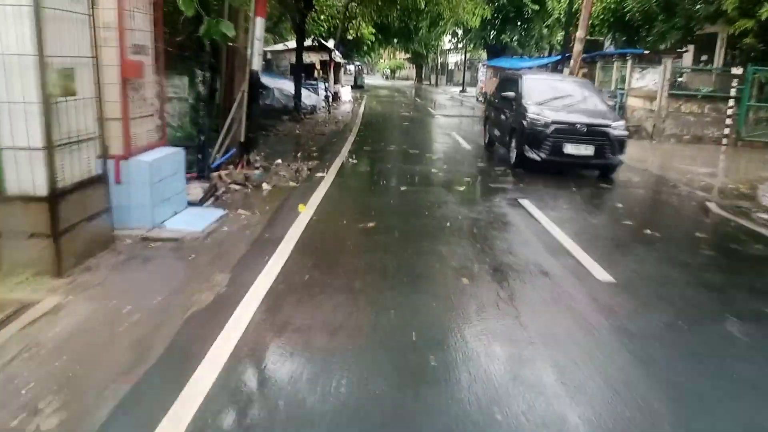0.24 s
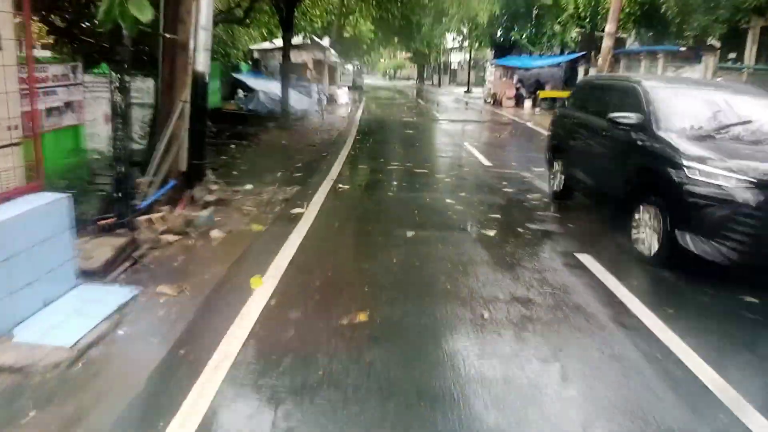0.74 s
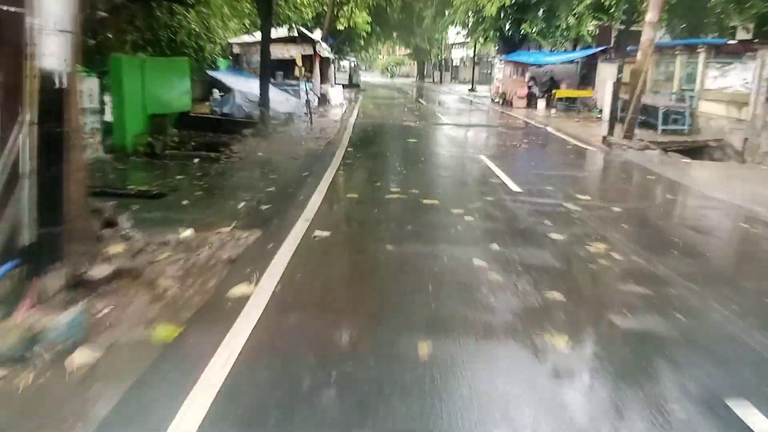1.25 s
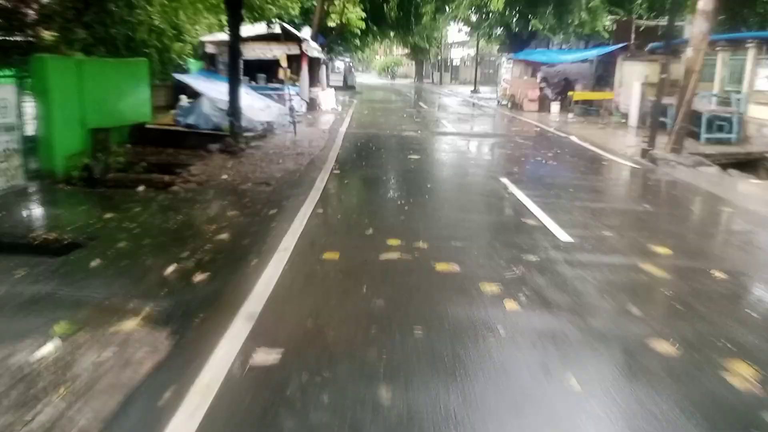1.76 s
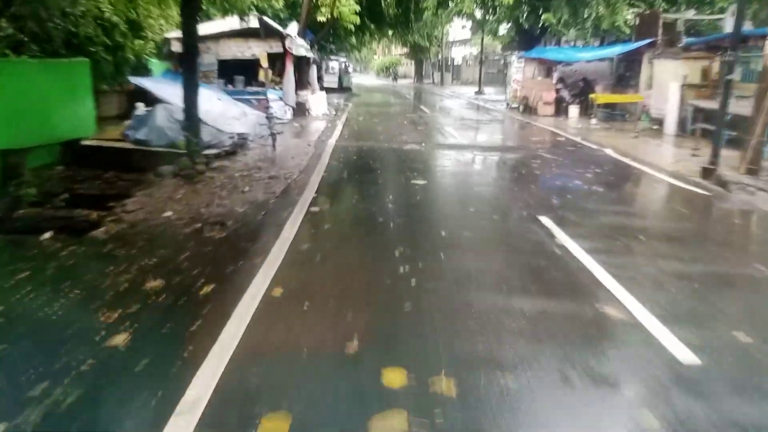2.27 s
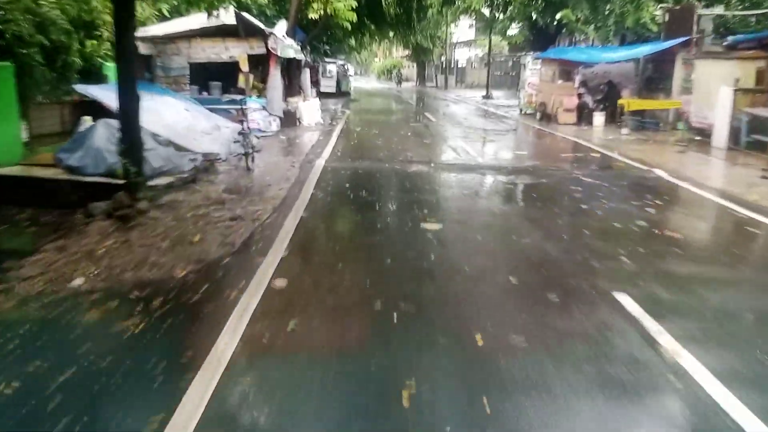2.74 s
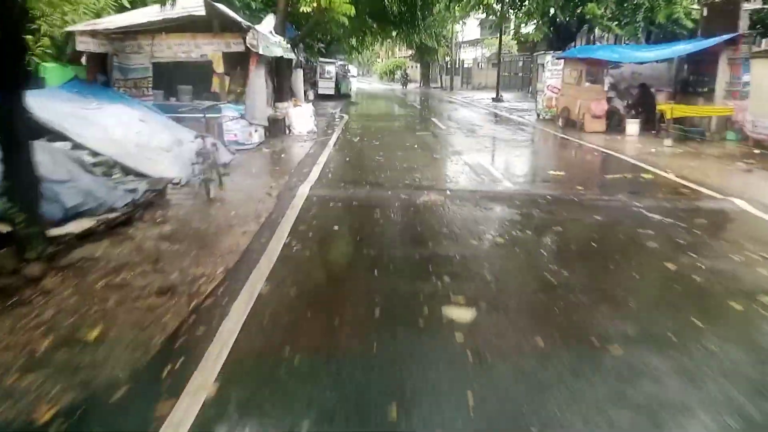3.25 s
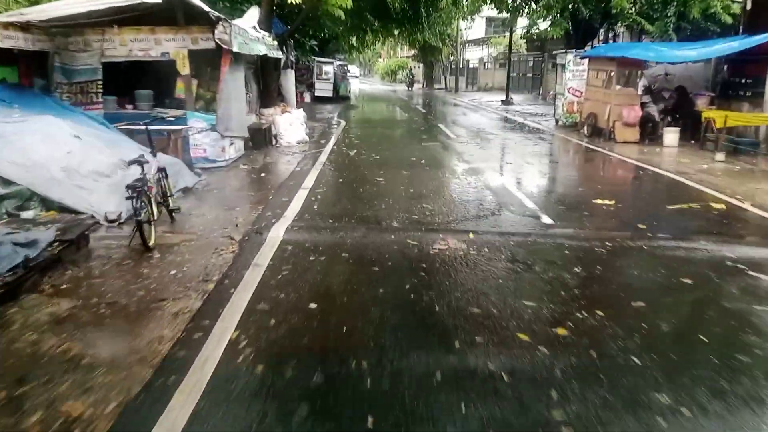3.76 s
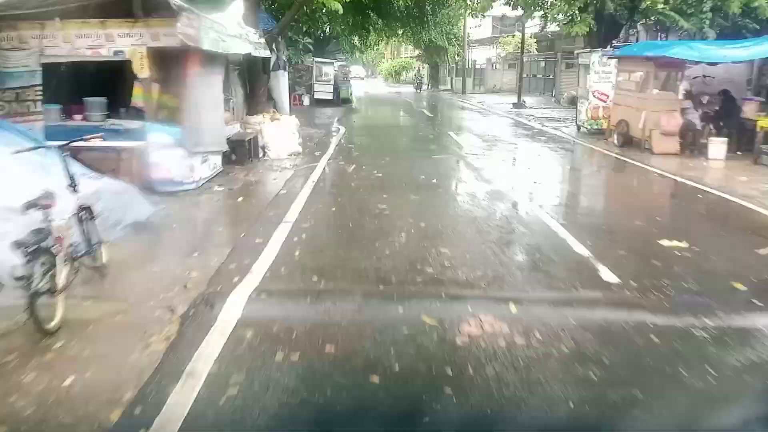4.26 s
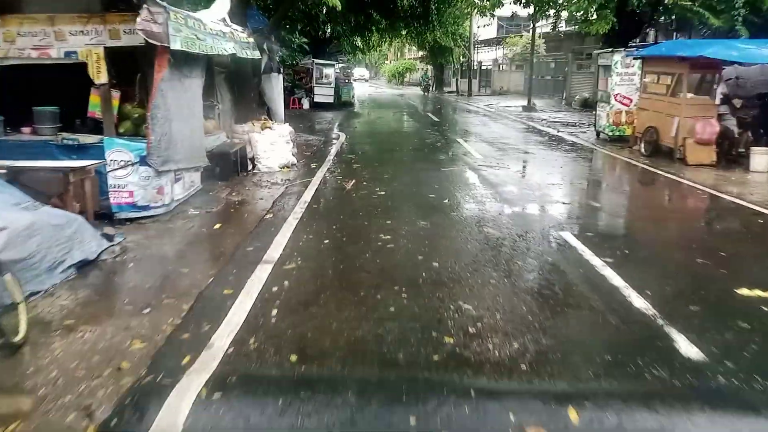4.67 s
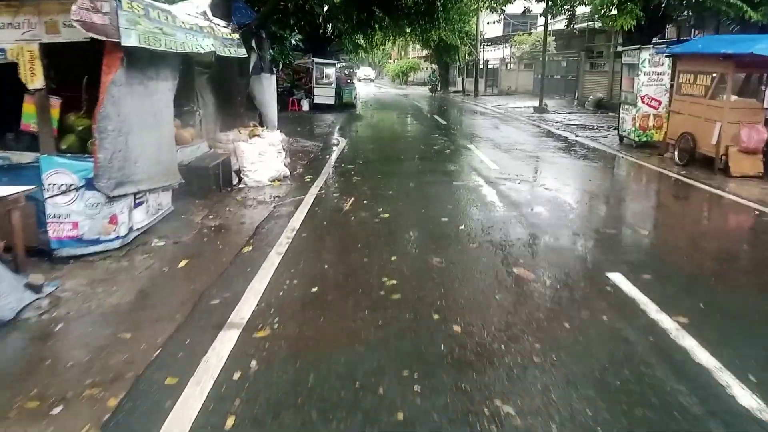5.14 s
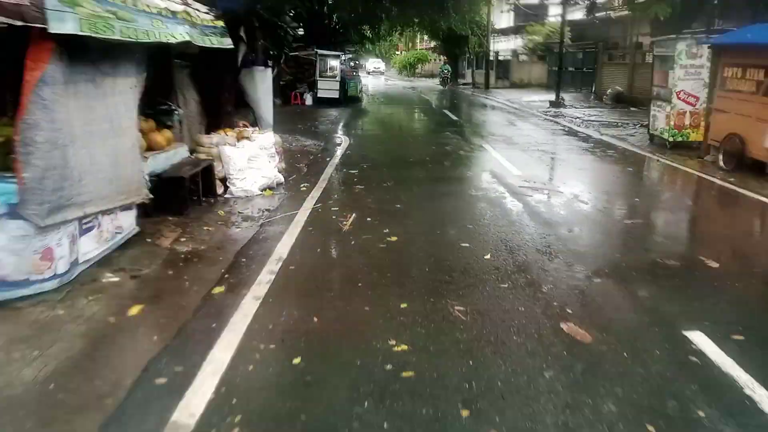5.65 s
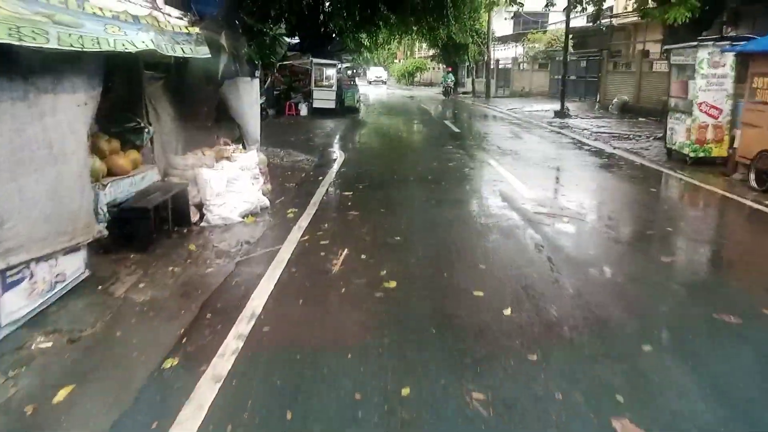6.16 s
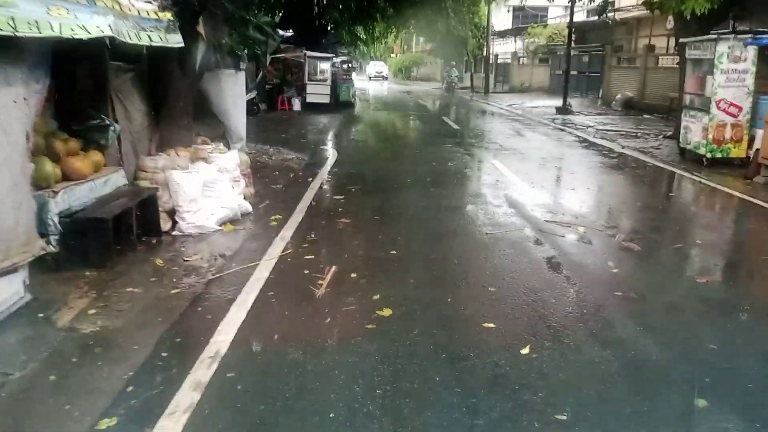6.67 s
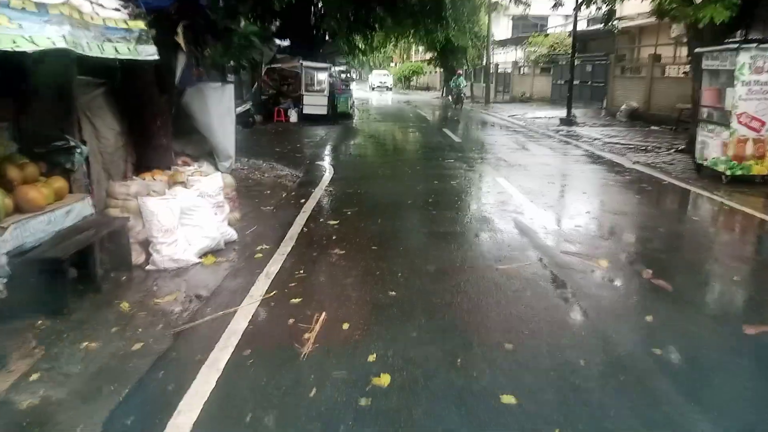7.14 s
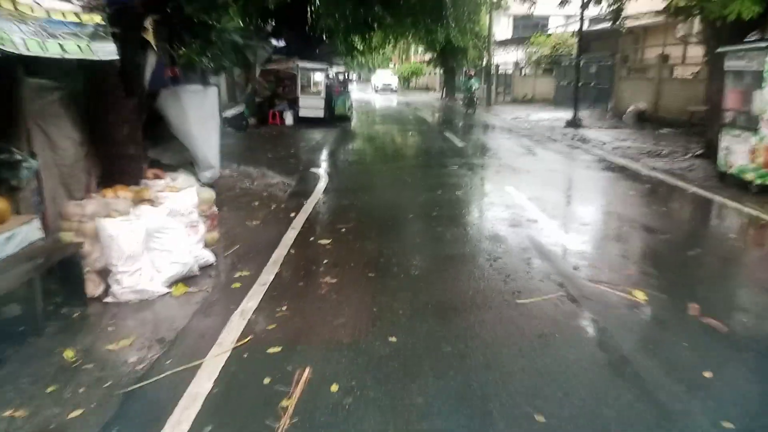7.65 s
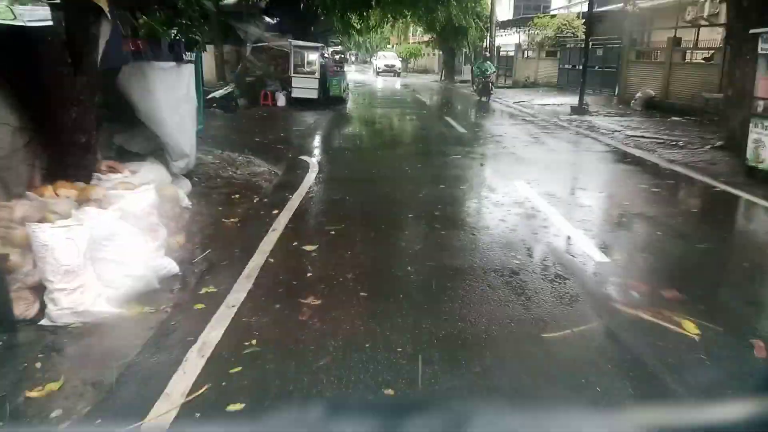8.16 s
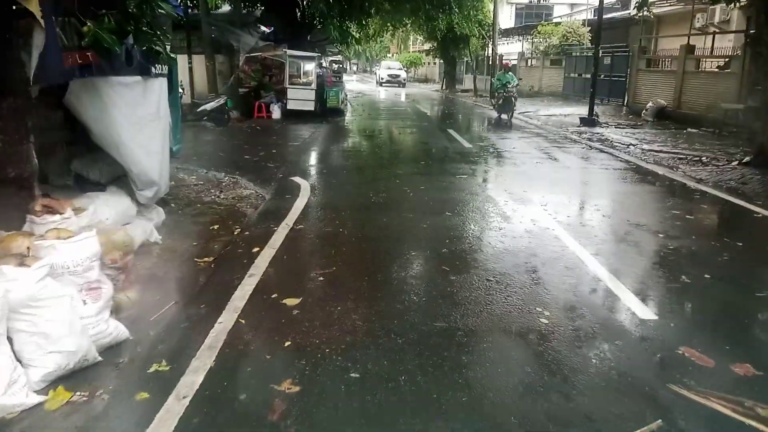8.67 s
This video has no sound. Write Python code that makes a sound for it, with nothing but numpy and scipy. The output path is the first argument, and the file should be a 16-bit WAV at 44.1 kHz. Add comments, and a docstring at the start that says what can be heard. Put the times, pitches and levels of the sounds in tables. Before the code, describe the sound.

Behind a rainy windscreen, hollow wiper knocks punctuate a low motor hum that eases into idle, with tyre spray, rattles and a passing car's hiss.

```python
"""Riding behind the windscreen of a small motorcycle-engined vehicle on a wet street.
At first the engine hums near a steady speed, a sum of firing orders; a car's noise-made spray peaks at 1.6 s.
From 2.4 s the engine eases off, its gear whine gliding down, to a chugging idle at 5.2 s; it picks up at 8.5 s.
Throughout, wiper knocks ring screen modes, catches and rattles are noise bursts, drops splash and ping the shell.
Coloured noise makes wind and road rumble and tyre spray, which follow road speed, and a background hiss."""
import sys
import numpy as np
from scipy import signal
from scipy.fft import rfft, irfft, next_fast_len
from scipy.io import wavfile
from scipy.ndimage import map_coordinates

SR = 44100
rng = np.random.default_rng(int(sys.argv[2]) if len(sys.argv) > 2 else 0)


def bounce(signal):
    """Save signal as a 16-bit WAV file at the path given by the first command-line argument."""
    frames = np.transpose(np.atleast_2d(signal))
    limited = np.clip(frames, -1, 1)
    pcm = np.round(limited * 32767).astype(np.int16)
    wavfile.write(sys.argv[1], SR, pcm)


N = 392931
TIME_S = np.arange(N) / SR

# noise colours, relative: freq_hz, density_db (per Hz)
HISS_COLOUR = [(500, 8), (1500, 10.5), (2050, -7), (2300, 6.5), (2850, 3.5), (3150, -7), (3500, 4),
               (4250, 3), (4700, 0.5), (5300, 5.5), (6300, 7.5), (7600, 1.5), (9000, -4), (11000, -17.5),
               (15500, -34.5)]
RUMBLE_COLOUR = [(30, -15), (68, 2), (98, 4), (180, 3.5), (270, -4), (410, -6), (520, -11.5), (680, -16.5),
                 (1000, -25), (2000, -62)]
SPRAY_COLOUR = [(400, 4.5), (850, 4.5), (1400, 7.5), (2000, 1), (3200, -5.5), (5000, -7.5), (6600, -4.5),
                (8500, -14), (10500, -23.5), (13300, -33), (15200, -22.5)]
CAR_COLOUR = [(500, -6), (900, 7), (1500, 5), (2200, -2.5), (3500, -6), (5500, -4), (6800, -7),
              (8500, -11.5), (10500, -21), (13300, -31), (15200, -17.5)]
SPLASH_COLOUR = [(1500, 4), (3000, 7), (5500, 4.5), (8000, 2.5), (11000, -11.5), (13000, -19), (15200, -15)]
THUD_COLOUR = [(110, 2), (180, 2), (270, -2), (400, -1), (520, -15), (680, -17.5), (1000, -35)]
CLACK_COLOUR = [(500, -5), (720, -2.5), (900, -1.5), (1130, -0.5), (1450, -11), (1800, -21), (2600, -29)]
CHIRP_COLOUR = [(1300, -17), (1800, -5), (2250, 0.5), (2700, -6), (3200, -11), (4500, -16), (7000, -21),
                (12000, -52)]
CLATTER_COLOUR = [(150, 5), (350, 1), (450, 13), (520, 15), (580, 5), (630, 8.5), (720, -19), (830, -3.5),
                  (1100, -3.5), (1420, -1.5), (1950, -14), (2400, -13.5), (4500, -19), (9000, -55)]
# how far narrow bands of the background hiss sink and return: freq_hz, depth_db
HISS_PATCH_DEPTH = [(1300, 0), (2200, 4.5), (4800, 4.5), (7000, 1.3)]
# road speed: time_s, share_of_cruise
ROAD_SPEED = [(0, 1), (2.4, 1), (2.8, 0.92), (3.25, 0.61), (4.8, 0.62), (5.2, 0.27), (6.3, 0.35),
              (8.2, 0.43), (8.91, 0.75)]
# drops on the shell: start_s, splash_db, ping_db
DROP_HITS = [(0.971, -44, -52), (3.085, -50.5, -41), (3.319, -41, -47), (4.405, -53, -48),
             (4.798, -51, -42), (5.681, -50.5, -55), (6.179, -56, -56), (6.346, -50, -38),
             (6.377, -45.5, -51), (8.58, -38, -48), (8.878, -42, -48)]
# shell modes: pitch_hz, level_db, t60_s
SHELL_MODES = [(3670, -5.5, 0.027), (5600, -4, 0.022)]
# blade catches and frame rattles: start_s, thud_db, clack_db, chirp_db
CATCHES_AND_RATTLES = [(1.331, -32.5, -51, -54), (2.287, -24.5, -35, -52), (3.557, -25.5, -47, -48),
                       (3.576, -31, -54, -50), (3.605, -46, -41, -46), (3.63, -23.5, -41.5, -61),
                       (3.687, -28, -39, -59), (4.078, -34, -49, -48), (4.336, -35, -41, -49),
                       (4.363, -23, -47, -49), (4.401, -30, -46, -51), (4.614, -29, -41, -56),
                       (4.829, -26, -48, -50), (4.87, -26.5, -38, -47), (4.888, -26, -39, -48),
                       (4.951, -24, -35.5, -50), (4.974, -32, -46, -60), (4.983, -28, -39, -66),
                       (4.995, -34, -47, -65), (5.006, -32.5, -43, -64), (5.021, -33.5, -50, -62),
                       (5.072, -35.5, -47, -62), (5.179, -37.5, -42, -51), (5.217, -33.5, -41.5, -57),
                       (5.776, -42, -51, -61), (6.014, -35.5, -44, -60), (6.083, -46, -55, -50),
                       (6.128, -34, -52, -46), (6.157, -24, -40, -48), (6.18, -37, -45, -57),
                       (6.203, -27.5, -52, -62), (6.251, -26, -39, -51), (6.272, -37, -50, -58),
                       (6.295, -24, -35.5, -57), (7.405, -37.5, -43, -55), (7.431, -26, -44, -59),
                       (7.45, -30, -46, -58), (7.474, -27, -37, -50), (7.518, -35, -49, -53),
                       (7.557, -21.5, -41, -51), (7.592, -24, -41, -60), (7.879, -42, -52, -56),
                       (7.934, -33, -41.5, -52), (8.238, -37, -41, -53), (8.581, -34.5, -38, -53),
                       (8.597, -38.5, -46, -48), (8.639, -31.5, -40, -56), (8.679, -33, -33.5, -49),
                       (8.742, -28, -46, -54), (8.769, -21, -35.5, -42.5), (8.826, -31, -39, -46),
                       (8.85, -31, -38, -56), (8.872, -31, -35, -46), (8.893, -28.5, -32.5, -47)]
# wiper cycles: far_turn_s, far_knock_db, near_knock_db
WIPER_CYCLES = [(1.082, -19.5, -10), (2.374, -15, -14), (3.656, -21, -11.5), (4.956, -17, -11.5),
                (6.29, -15, -8), (7.558, -16.5, -8.5), (8.896, -19, -8.5)]
# arm flips over, rocks back, settles: delay_s, level_db, direction (+1 or -1)
ARM_CONTACTS = [(0, -1, 1), (.0081, -3, -1), (.0193, -4, 1)]
# windscreen and frame modes: pitch_hz, level_db, t60_s
SCREEN_MODES = [(154, -5, 0.02), (187.3, -6, 0.13), (286, -11.5, 0.12), (389, -9.5, 0.065),
                (458.6, -15.5, 0.095), (884, -24.5, 0.032)]
# engine speed: time_s, firing_hz
FIRING_RATE = [(0, 57.43), (.5, 58.09), (1.95, 58.84), (2.35, 57.83), (2.8, 55.84), (3.75, 45.27),
               (4.4, 38.07), (4.9, 31.53), (5.2, 22.06), (5.5, 21.06), (6.2, 21.27), (7.0, 20.78),
               (7.4, 19.0), (8.2, 19.6), (8.58, 24.5), (8.91, 23.19)]
# exhaust boom: time_s, level_db, bite_db (per octave of order)
THROTTLE_CURVE = [(0, -18.5, 0.5), (1.4, -19, 0), (1.8, -20, 1), (2.15, -19, 0), (2.65, -16, -4.5),
                  (3.0, -17, -0.5), (4.0, -20, 2.5), (4.75, -22.5, -0.5), (4.95, -31, 1), (5.15, -41, 2),
                  (5.5, -35, 2), (7.0, -31.5, 0), (7.5, -58.5, 13.5), (8.0, -38.5, 2), (8.5, -28, 1),
                  (8.91, -23.5, -2.5)]
# engine load, heard as sharp exhaust pulses: time_s, level_db
PULSE_LOAD = [(0, -27), (2.0, -25.5), (2.6, -33.5), (3.3, -37.5), (4.8, -34.5), (5.15, -50), (5.45, -41.5),
              (7.0, -45.5), (8.5, -35), (8.91, -41)]
# exhaust balance against engine speed: firing_hz, order_1_db ... order_5_db
ORDER_BALANCE = [(21, 0, 0, -2, .5, 1), (24.7, 0, 1.5, -3, 2, -1), (31.2, -7, -6, 2.5, -10, -1),
                 (40, -.5, -4.5, .5, -11.5, -1.5), (49.7, 0.5, -1.5, 0, -2, -1.5),
                 (60.2, -0.1, 0.5, 1.5, 3, -1.5)]
# orders between the whole ones: order (per firing)
BURR_ORDERS = (3.5, 4.5, 5.5)
# brief dips of one order: order, centre_s, width_s, depth_db
ORDER_DIPS = [(2, 1.65, 0.24, -10), (3, 2.53, 0.28, -13)]
# cabin response to the low orders: freq_hz, level_db
CABIN_RESPONSE = [(30, -36), (37, -12), (43, -2.5), (54, -1.5), (59, -4.5), (64, -12), (72, -26),
                  (84, -6.5), (102, -6), (116, -8), (130, -9), (155, -12), (177, -13.5), (192, -18),
                  (213, -12.5), (245, -30), (292, -17)]
# exhaust pipe heard through the body: freq_hz, level_db
PIPE_RESPONSE = [(110, 5.5), (165, -10), (215, 2.5), (245, -6), (292, 6), (345, -14.5), (408, -14),
                 (465, -7), (560, -22.5), (640, -10.5), (740, -29.5), (830, -6.5), (930, -20.5),
                 (1030, -10.5), (1170, -32), (1370, -6), (1600, -22)]

HISS_DB, PATCH_HZ, PATCH_S = -56, 200, 0.3
RUMBLE_DB, RUMBLE_DB_PER_DOUBLING = -28.5, 3.5  # at cruise; growth with speed
SPRAY_DB, SPRAY_DB_PER_DOUBLING = -44.5, 18.5
CAR_PASS_S, CAR_DB = 1.59, -40.5  # at its nearest
CAR_GAP_M, CLOSING_M_PER_S, CAR_DB_PER_DOUBLING = 1.84, 9.6, -6.5  # last: per doubling of distance
SPLASH_RISE_S, SPLASH_T60_S = 0.0015, 0.055
THUD_T60_S, CLACK_T60_S, CHIRP_T60_S = 0.12, 0.042, 0.035
TAIL_DB, TAIL_RISE_S, TAIL_T60_S = -9.5, 0.0067, 0.11  # gritty tail, level relative to its burst
WIPER_START_S, WIPER_PERIOD_S = 0.4342, 1.3
WHINE_DB, WHINE_ORDER, CASING_HZ, CASING_WIDTH_HZ = -48, 13.5, 676, 164
CLATTER_DB = -42.5  # extrapolated to zero bite and zero firing rate
CLATTER_DB_PER_BITE_DB, CLATTER_DB_PER_HZ = 2.2, -0.0642  # bite counts only below zero
BOOM_HZ, BOOM_WIDTH_HZ, PIPE_HZ = 54, 30, 140
BURR_DB = -12.5
HIGHPASS_HZ, STOPBAND_HZ = 32, 16748


def from_db(db):
    """Decibels to amplitude gain."""
    return 10 ** (np.asarray(db) / 20)


def rms_one(x):
    """Scale to unit power."""
    return x / np.sqrt(np.mean(x ** 2) + 1e-20)


def in_time(rows):
    """Interpolate each column of a curve table at every sample."""
    s, *columns = np.transpose(rows)
    return [np.interp(TIME_S, s, column) for column in columns]


def at_hz(points, hz):
    """Read a spectrum in dB on a log-frequency axis."""
    f, db = np.transpose(points)
    return np.interp(np.log(hz), np.log(f), db)


def drift(rate_hz):
    """Smooth random curve, rms 1, with rate_hz knots a second."""
    knots = rng.standard_normal(int(N / SR * rate_hz) + 4)
    coarse_s = TIME_S[::50]
    coarse = map_coordinates(knots, [coarse_s * rate_hz + 1], order=3, mode="nearest")
    return rms_one(np.interp(TIME_S, coarse_s, coarse))


def colour(x, spectrum):
    """Filter by a smooth spectrum, steep beyond its ends; white noise keeps its power."""
    size = next_fast_len(N + SR // 4)
    hz = np.maximum(np.arange(size // 2 + 1) * SR / size, 1)
    low_skirt = 1 + (spectrum[0][0] / 2 / hz) ** 8
    high_skirt = 1 + (hz / spectrum[-1][0] / 2) ** 8
    gain = from_db(at_hz(spectrum, hz)) / np.sqrt(low_skirt * high_skirt)
    return irfft(rfft(x, size) * rms_one(gain), size)[:N]


def noise(spectrum, envelope=1):
    """Random excitation under an envelope, then coloured."""
    return colour(envelope * rng.standard_normal(N), spectrum)


def strikes(events):
    """One click per (start_s, level_db) event."""
    s, db = np.transpose(events)
    clicks = np.zeros(N)
    clicks[np.clip(s * SR, 0, N - 1).astype(int)] = from_db(db)
    return clicks


def ring(clicks, hz, t60_s):
    """Two-pole resonator: a unit click starts a decaying sine of height 1."""
    r = from_db(-60 / (t60_s * SR))
    w = 2 * np.pi * hz / SR
    return signal.lfilter([0, np.sin(w)], [1, -2 * r * np.cos(w), r * r], clicks + 1e-18)


def fade(clicks, t60_s):
    """Envelope that jumps at each click and dies away exponentially."""
    return signal.lfilter([1], [1, -from_db(-60 / (t60_s * SR))], clicks + 1e-18)


def soften(envelope, rise_s):
    """Round off an envelope's attack with a one-pole lowpass."""
    r = np.exp(-1 / (rise_s * SR))
    return signal.lfilter([1 - r], [1, -r], envelope)


def patchy(x, depth_points):
    """Narrow bands of a hiss sink and return slowly, each on its own."""
    hz, s, bands = signal.stft(x, SR, nperseg=1024)
    place = np.array(np.meshgrid(hz / PATCH_HZ, s / PATCH_S, indexing="ij"))
    knots = rng.standard_normal(place[:, -1, -1].astype(int) + 2)
    shift = map_coordinates(np.minimum(knots, 0.5), place, mode="nearest")
    depth_db = at_hz(depth_points, np.maximum(hz, 1))[:, None]
    return signal.istft(bands * from_db(depth_db * shift), SR)[1][:N]


def background_hiss():
    """Steady background hiss, slightly uneven, with narrow bands that sink and return."""
    hiss = noise(HISS_COLOUR, from_db(1.37 * drift(22)))
    return from_db(HISS_DB) * patchy(hiss, HISS_PATCH_DEPTH)


def speed_doublings():
    """Road speed in doublings relative to cruise."""
    return np.log2(np.maximum(in_time(ROAD_SPEED)[0], 1e-2))


def rumble():
    """Lumpy low noise of wind and road, growing with speed."""
    lumpy = rms_one(noise(RUMBLE_COLOUR, from_db(0.85 * drift(25))))
    return from_db(RUMBLE_DB + RUMBLE_DB_PER_DOUBLING * speed_doublings()) * lumpy


def wet_tyres(level_db, spectrum):
    """Spray as coloured noise with a flutter and a fine grain."""
    flutter_db = 1.37 * drift(30.03)
    grain_db = 1.0 * drift(700)
    return from_db(level_db) * noise(spectrum, from_db(flutter_db + grain_db))


def own_spray():
    """The vehicle's own tyre spray, growing steeply with speed."""
    return wet_tyres(SPRAY_DB + SPRAY_DB_PER_DOUBLING * speed_doublings(), SPRAY_COLOUR)


def passing_car():
    """An oncoming car's tyre hiss, falling with straight-line distance."""
    distance_m = np.hypot(CAR_GAP_M, CLOSING_M_PER_S * (TIME_S - CAR_PASS_S))
    level_db = CAR_DB + CAR_DB_PER_DOUBLING * np.log2(distance_m / CAR_GAP_M)
    return wet_tyres(level_db, CAR_COLOUR)


def drops():
    """Each drop splashes briefly and rings the shell modes with strengths of its own."""
    s, splash_db, ping_db = np.transpose(DROP_HITS)
    pings = 0
    for hz, mode_db, t60_s in SHELL_MODES:
        luck_db = 2 * rng.standard_normal(len(s))
        pings = pings + ring(strikes(np.c_[s, ping_db + mode_db + luck_db]), hz, t60_s)
    splash_envelope = soften(fade(strikes(np.c_[s, splash_db]), SPLASH_T60_S), SPLASH_RISE_S)
    return pings + noise(SPLASH_COLOUR, splash_envelope)


def catches_and_rattles():
    """Blade catches and frame rattles: low thud, middle clack, high chirp, each with a gritty tail."""
    s, *levels_db = np.transpose(CATCHES_AND_RATTLES)
    grit = from_db(TAIL_DB + 4.5 * drift(160))
    colours = (THUD_COLOUR, CLACK_COLOUR, CHIRP_COLOUR)
    t60s_s = (THUD_T60_S, CLACK_T60_S, CHIRP_T60_S)
    out = 0
    for db, spectrum, t60_s in zip(levels_db, colours, t60s_s):
        clicks = strikes(np.c_[s, db])
        tail = grit * soften(fade(clicks, TAIL_T60_S), TAIL_RISE_S)
        out = out + noise(spectrum, fade(clicks, t60_s) + tail)
    return out


def wiper_turns():
    """Times and knock levels of both turns; the near one keeps strict time."""
    far_s, far_db, near_db = np.transpose(WIPER_CYCLES)
    near_s = WIPER_START_S + WIPER_PERIOD_S * np.arange(len(far_s))
    return np.r_[near_s, far_s], np.r_[near_db, far_db]


def wiper():
    """At each turn the arm hits the screen three times; every contact favours other modes."""
    s, db = wiper_turns()
    knocks = 0
    for k, (hz, mode_db, t60_s) in enumerate(SCREEN_MODES, 1):
        clicks = 0
        for delay_s, contact_db, direction in ARM_CONTACTS:
            luck_db = 1.0 * rng.standard_normal(len(s))
            clicks = clicks + direction * strikes(np.c_[s + delay_s, db + contact_db + luck_db])
        knocks = knocks + (-1) ** k * from_db(mode_db) * ring(clicks, hz, t60_s)
    return signal.sosfilt(signal.butter(2, 900, fs=SR, output="sos"), knocks)


def gearbox(cycles, firing_hz):
    """Unsteady gear whine, loudest as it glides through the casing's resonance."""
    detuning = 2 * (WHINE_ORDER * firing_hz - CASING_HZ) / CASING_WIDTH_HZ
    level = from_db(WHINE_DB + 3.0 * drift(18)) / (1 + detuning ** 2)
    return level * np.sin(2 * np.pi * WHINE_ORDER * cycles + 1.2 * drift(45))


def per_firing(cycles, spread_db, limp_db):
    """Gain curve: each firing has its own strength, and alternate ones are stronger."""
    n = np.arange(int(cycles[-1]) + 2)
    strength_db = spread_db * rng.standard_normal(len(n)) + limp_db * (-1.) ** n
    return from_db(np.interp(cycles, n, strength_db))


def clatter(cycles, firing_hz, bite_db):
    """Valves and casing rasp once per firing, fainter as the throttle shuts."""
    level_db = CLATTER_DB + CLATTER_DB_PER_BITE_DB * np.minimum(bite_db, 0) + CLATTER_DB_PER_HZ * firing_hz
    gate = np.exp(0.3 * np.cos(2 * np.pi * (cycles - 0.15)))
    gate = gate * per_firing(cycles, spread_db=1.3, limp_db=0.5)
    return from_db(level_db) * rms_one(noise(CLATTER_COLOUR, gate))


def exhaust_order(k, cycles, firing_hz):
    """One order of the firing rate; pipe and cabin resonance smear it in time by a phase lag."""
    hz = k * firing_hz
    lag_rad = 1.4 + 10 * np.log1p(hz / PIPE_HZ) + 1.9 * np.arctan((hz - BOOM_HZ) / BOOM_WIDTH_HZ)
    return np.cos(2 * np.pi * k * cycles - lag_rad)


def order_dip_db(k):
    """Brief Gaussian dips in the level of order k."""
    return sum(depth_db * np.exp(-((TIME_S - centre_s) / width_s) ** 2)
               for which, centre_s, width_s, depth_db in ORDER_DIPS if round(which) == k)


def exhaust_boom(cycles, firing_hz, boom_db, bite_db):
    """Smooth low orders through the cabin, with a faint burr of half orders from unlike firings."""
    rates_hz, *balance_db = np.transpose(ORDER_BALANCE)
    boom = 0
    for k, own_db in enumerate(balance_db, 1):
        db = np.interp(firing_hz, rates_hz, own_db) + at_hz(CABIN_RESPONSE, k * firing_hz)
        db = db + bite_db * np.log2(k) + 0.8 * drift(6) + order_dip_db(k)
        boom = boom + from_db(db) * exhaust_order(k, cycles, firing_hz)
    for k in BURR_ORDERS:
        db = BURR_DB + at_hz(CABIN_RESPONSE, k * firing_hz)
        db = db + np.minimum(bite_db, 0) * np.log2(k) + 2.5 * drift(4)
        boom = boom + from_db(db) * exhaust_order(k, cycles, firing_hz)
    return np.sqrt(2) * boom * from_db(boom_db) * per_firing(cycles, spread_db=0.04, limp_db=0.6)


def exhaust_pulses(cycles, firing_hz, pulse_db):
    """Orders 6 to 26 line up into one uneven pulse per firing, coloured by the pipe."""
    ragged_cycles = cycles + 0.006 * 21 / firing_hz * drift(25)  # raggeder at low speed
    pulses = 0
    for k in range(6, 27):
        blunt_db = 9.5 * np.log2(k / 4)  # a puff lasts a set share of the turn
        db = at_hz(PIPE_RESPONSE, k * firing_hz) - blunt_db + 2.5 * drift(4)
        pulses = pulses + from_db(db) * exhaust_order(k, ragged_cycles, firing_hz)
    return np.sqrt(2) * pulses * from_db(pulse_db) * per_firing(cycles, spread_db=0.8, limp_db=-1.2)


def engine():
    """Whine, clatter and exhaust share one slightly wandering firing phase."""
    firing_hz, = in_time(FIRING_RATE)
    boom_db, bite_db = in_time(THROTTLE_CURVE)
    pulse_db, = in_time(PULSE_LOAD)
    cycles = np.cumsum(firing_hz + 0.03 * drift(10)) / SR
    mechanical = gearbox(cycles, firing_hz) + clatter(cycles, firing_hz, bite_db)
    boom = exhaust_boom(cycles, firing_hz, boom_db, bite_db)
    return mechanical + boom + exhaust_pulses(cycles, firing_hz, pulse_db)


def scene():
    """Hiss, road, drops, catches and rattles, wiper and engine at one microphone."""
    background = background_hiss() + rumble() + own_spray() + passing_car()
    return (background + drops() + catches_and_rattles() + wiper() + engine())[None]


def record(dry):
    """The microphone drops the deepest bass; the top is cut."""
    thin = signal.sosfilt(signal.butter(6, HIGHPASS_HZ, "high", fs=SR, output="sos"), dry)
    return signal.sosfilt(signal.cheby2(16, 70, STOPBAND_HZ, fs=SR, output="sos"), thin)


dry = scene()
out = record(dry)
bounce(out)
```